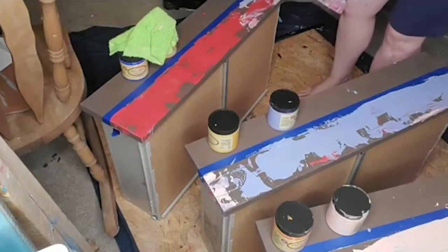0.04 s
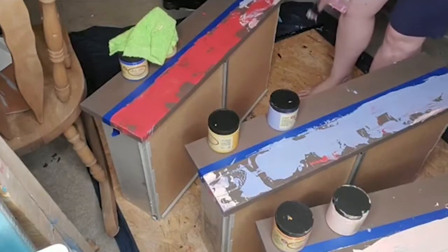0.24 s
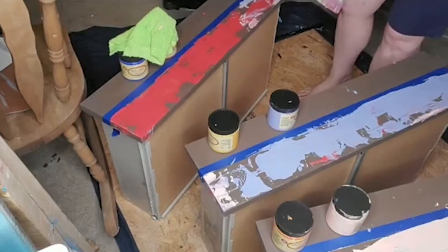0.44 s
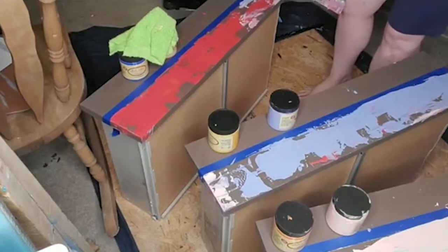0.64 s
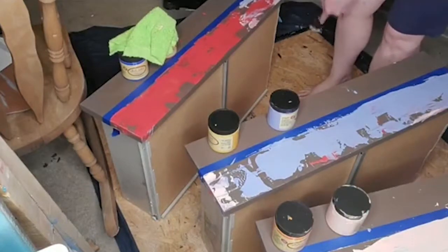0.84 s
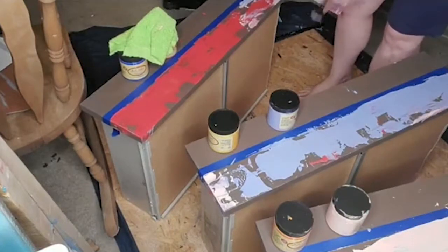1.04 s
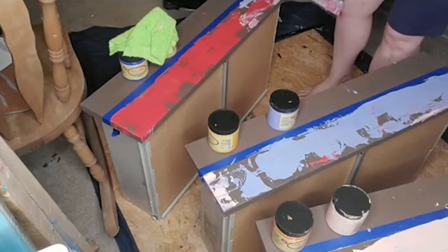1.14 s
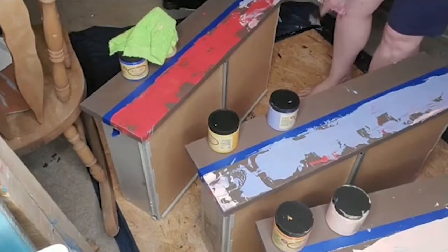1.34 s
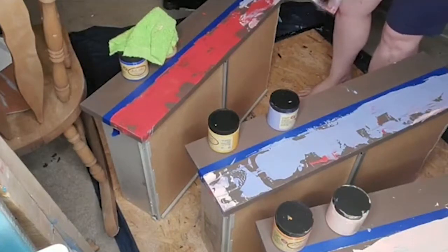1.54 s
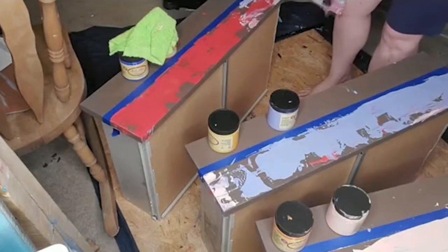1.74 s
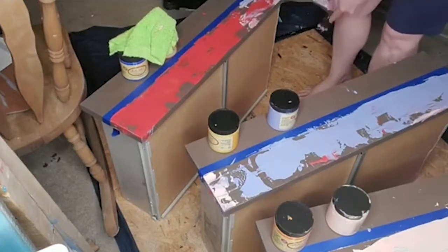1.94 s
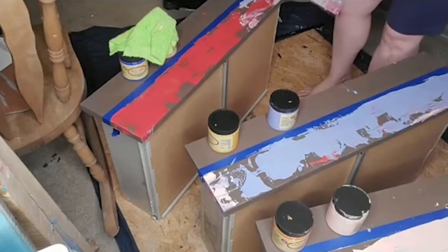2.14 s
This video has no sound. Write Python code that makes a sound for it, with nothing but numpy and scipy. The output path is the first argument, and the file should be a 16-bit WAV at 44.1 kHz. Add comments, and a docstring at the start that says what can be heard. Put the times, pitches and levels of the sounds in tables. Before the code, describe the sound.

A steel putty knife scrapes painted wood, snapping sharply four times over a faint machine hum.

```python
"""A small hard room, the microphone at a steel putty knife that works over paint on a wooden board.
The blade is set down or catches, slides briefly and snaps forward when the paint lets go. Each contact is one
jolt through the ringing steel and the board; the slides are random grit through the blade, the squeals jittery
sines. Each excites decaying noise that stands for the room. Behind, a machine somewhere in the house: steady
coloured noise and two thin tones that waver a little."""
import sys
import numpy as np
from scipy import signal
from scipy.fft import rfft, irfft, next_fast_len
from scipy.io import wavfile
from scipy.ndimage import map_coordinates

SR = 44100
rng = np.random.default_rng(int(sys.argv[2]) if len(sys.argv) > 2 else 0)


def to_wav(s):
    """Save 16-bit WAV."""
    ch = np.atleast_2d(s).T  # columns
    pcm = np.round(np.clip(ch, -1, 1) * 32767)  # PCM
    wavfile.write(sys.argv[1], SR, pcm.astype(np.int16))


def rack_gain(trim_db):
    """Turn a fader trim in dB into the linear factor to multiply a signal by."""
    fader = np.asarray(trim_db, float)
    return 10 ** (fader / 20)


N = 97020  # 2.2 s
SPAN = 1 << 14  # samples of one event with its room
HZ = np.fft.rfftfreq(SPAN, 1 / SR)

# The blade snaps forward. Each row: start in seconds, relative level in dB, brightness in dB per octave,
# low and high knock of the board in dB over the blade's strongest frequency.
SNAPS = [(0.2618, -14, 0.53, -17.5, -36), (0.8579, -16.5, 1.8, -6.5, -10.5), (1.4013, -14, 0, -16, -49.5),
         (1.88, -12.5, -1, -48, -15)]
# The free end is held shorter or longer, so each snap rings elsewhere.
# Each row, in step with the snaps: ring in dB over the clatter, four bending pitches in Hz.
SNAP_RINGS = [(4.3, 2030, 2400, 4530, 5500), (6.5, 2900, 2000, 4290, 5980), (4.3, 2600, 3330, 5940, 7530),
              (5.5, 1840, 2650, 3820, 6600)]
# The blade is set down or catches. Each row: start in seconds, relative level in dB, brightness in dB per octave,
# first and second bending pitch in Hz.
TOUCHES = [(.001, -40.5, 6, 1860, 4280), (0.5605, -31, 0, 2170, 4370), (0.8769, -24.5, -2.5, 4220, 2810),
           (1.2645, -26.5, 0, 3160, 4390), (1.3659, -25.5, 4.5, 1770, 3880),
           (1.7232, -28, -6.5, 1324, 2570), (1.762, -30, -3.5, 1125, 4900), (1.786, -33.5, 0.5, 2670, 5100),
           (1.851, -37, 0.5, 3300, 6100), (2.1592, -31, -1.5, 1270, 4420)]
# Slides over the paint. Each row: start in seconds, length in seconds, first and last relative level in dB,
# brightness in dB per octave.
SLIDES = [(0.202, 0.063, -62, -43.5, 2.5), (0.574, 0.04, -55, -56, 2.5), (0.806, 0.031, -74.5, -51, 0.5),
          (0.827, 0.074, -48, -42.5, 4.5), (1.332, 0.038, -54.5, -36, 3), (1.375, 0.026, -47, -44, -5.5),
          (1.738, .06, -49, -46, -2.5), (1.796, 0.049, -49.5, -46.5, 0.5), (1.867, 0.0027, -49.5, -47, 24)]
# The edge squeals. Each row: start in seconds, length in seconds, pitch in Hz, level before the fades in dB.
SQUEALS = [(.828, 0.017, 4400, -49), (.246, 0.023, 4430, -31.5), (0.248, 0.012, 11060, -33),
           (.246, 0.0157, 9600, -40.5)]
# Modes of the steel. Each row: pitch in Hz, width in Hz, mean strength in dB over the broad clatter.
BLADE_MODES = [(2364, 160, -4), (3970, 150, -3.5), (4780, 61, -1.5), (5994, 2200, -2), (6280, 120, -11),
               (7570, 290, 1), (9180, 410, -1), (10030, 230, 3), (11440, 1700, 4.5)]
# Broad clatter of a snap, of a touch and of a slide. Each row: frequency in Hz, relative gain in dB.
SNAP_CLATTER = [(530, -25), (1060, -26.5), (1470, -9.5), (2080, 2), (2910, -3), (4470, -2), (8440, -3),
                (11400, -6.5), (14600, -16), (15700, -37.5)]
TOUCH_CLATTER = [(530, -47.5), (900, -20.5), (1300, -5.5), (1650, -5.5), (2700, -5), (3500, -10),
                 (5600, -9), (8000, -6.5), (11500, -16), (14600, -21.5), (15700, -66.5)]
SLIDE_RASP = [(530, -45), (900, -17.5), (2770, 5), (3050, 1), (3320, 4), (4980, 0), (8850, -9.5),
              (10100, -7), (12100, -11.5), (14800, -24.5), (15700, -62)]
# Resonances of the wooden board. Each row: pitch in Hz, width in Hz.
BOARD = [(450, 260), (960, 110)]
# Decay of the room. Each row: frequency in Hz, time to fall by 60 dB in seconds.
ROOM = [(300, 0.35), (800, 0.31), (2100, 0.2), (5500, .22), (12000, 0.2), (16000, 0.034)]
# Colour of the machine's rumble and hiss. Each row: frequency in Hz, relative gain in dB.
RUMBLE = [(21, -68.5), (35, -1), (134, 0), (195, -14), (251, -9), (298, -20), (346, -13), (556, -23),
          (614, -16.5), (662, -24.5), (732, -15.5), (829, -22.5), (915, -22.5), (1400, -27.5),
          (1580, -30.5), (2080, -33.5), (2240, -34), (2540, -34), (3700, -35.5), (6390, -47),
          (10800, -47.5), (13500, -64)]
# Thin tones of the machine. Each row: pitch in Hz, mean level in dB rms, depth of the wavering in dB.
TONES = [(720.3, -62.6, .8), (119.5, -61, 1.8)]

MODE_SCATTER_DB = 4  # from contact to contact
SNAP_SPREAD_S, TOUCH_SPREAD_S = 0.0014, 0.003  # largest delay between the frequencies of a contact
SNAP_WIDTH, BEND_WIDTH = 0.07, 0.12  # width of a ring over its pitch
FIRST_BEND_DB, SECOND_BEND_DB, HANDLE_DB = 18, 17, 14  # rings of a touch over the clatter
HANDLE_HZ, TOUCH_KNOCK_DB = 2064, -20.5  # ring shared by all touches, knock of the board
GRIT_PER_S, GRIT_SPREAD_DB = 3000, 2.6  # grains in a slide, scale of their uneven strength
CATCH_DB, CATCH_PER_S, SLIDE_RISE_S = 2.2, 150, 0.0015  # the slide is uneven and fades in
SQUEAL_JITTER, SQUEAL_RISE_S = 0.045, 0.0035  # radians a sample, seconds
# Room over direct sound in dB; a snap points at the microphone.
SNAP_WET_DB, TOUCH_WET_DB, SLIDE_WET_DB, SQUEAL_WET_DB = 2, 5, 4, 0
# Delay of the first wall; the early room stands out of the tail, which takes a moment to build.
FIRST_WALL_S, EARLY_DB, EARLY_S, BUILD_S = 0.0012, 2, 0.0061, 0.0016
RUMBLE_DB = -53  # dB rms


def snaps():
    """The paint lets go and the bent blade springs forward, ringing at the pitches of its free length."""
    out = np.zeros(N + SPAN)
    for (start, db, bright, *knocks_db), (ring_db, *pitches) in zip(SNAPS, SNAP_RINGS):
        bends = [(hz, ring_db) for hz in pitches]
        gain = blade(SNAP_CLATTER, bright, SNAP_WIDTH, *bends)
        sound = contact(gain, knocks_db, SNAP_SPREAD_S, db + 10.5)
        add_in_room(out, start, sound, SNAP_WET_DB)
    return out[:N]


def touches():
    """The blade set down or catching: two changing bends, one shared ring and a light knock of the board."""
    out = np.zeros(N + SPAN)
    for start, db, bright, first_hz, second_hz in TOUCHES:
        bends = [(first_hz, FIRST_BEND_DB), (second_hz, SECOND_BEND_DB), (HANDLE_HZ, HANDLE_DB)]
        gain = blade(TOUCH_CLATTER, bright, BEND_WIDTH, *bends)
        sound = contact(gain, [TOUCH_KNOCK_DB] * len(BOARD), TOUCH_SPREAD_S, db + 10)
        add_in_room(out, start, sound, TOUCH_WET_DB)
    return out[:N]


def slides():
    """Edge over paint: sparse random grains shake the blade while the stroke swells or fades."""
    out = np.zeros(N + SPAN)
    t = np.arange(SPAN) / SR
    for start, length, first_db, last_db, bright in SLIDES:
        chance, push, rank = rng.random((3, SPAN))
        strength = rack_gain(-GRIT_SPREAD_DB * np.log(rank + 1 / 40))
        grit = (chance < GRIT_PER_S / SR) * (push - 0.5) * strength
        rasp = unit(irfft(rfft(grit) * causal(blade(SLIDE_RASP, bright, BEND_WIDTH))))
        # the direct sound is lowered by the room's share
        stroke = rack_gain(np.interp(t, [0, length], [first_db, last_db]) - SLIDE_WET_DB)
        stroke = stroke * np.minimum(t / SLIDE_RISE_S, 1) * (t < length)
        catches_db = CATCH_DB * map_coordinates(rng.standard_normal(60), [t * CATCH_PER_S])
        add_in_room(out, start, rasp * stroke * rack_gain(catches_db), SLIDE_WET_DB)
    return out[:N]


def squeals():
    """The edge squeals: short sines whose phase wanders at random."""
    out = np.zeros(N + SPAN)
    t = np.arange(SPAN) / SR
    for start, length, hz, db in SQUEALS:
        wander = np.cumsum(SQUEAL_JITTER * rng.standard_normal(SPAN))
        wave = np.sin(2 * np.pi * hz * t + wander)
        fades = np.clip(t / SQUEAL_RISE_S, 0, 1) * np.clip(1 - t / length, 0, 1)
        add_in_room(out, start, rack_gain(db) * wave * fades, SQUEAL_WET_DB)
    return out[:N]


def blade(clatter, bright_db, width, *bends):
    """Gain of the steel: broad clatter, its modes at new strengths, and the bends (Hz, dB) of the free end."""
    modes = sum(rack_gain(db + MODE_SCATTER_DB * rng.standard_normal()) * hump(hz, w) ** 2
                for hz, w, db in BLADE_MODES)
    rings = sum(rack_gain(db) * hump(hz, width * hz) ** 2 for hz, db in bends)
    tilt_db = bright_db * np.log2((HZ + 1) / 4000)
    return rack_gain(along(clatter, HZ) + tilt_db) * (1 + modes + rings)


def contact(gain, knocks_db, spread_s, db):
    """One jolt through blade and board; the frequencies arrive a little apart. db sets its total energy."""
    board = sum(rack_gain(knock_db) * hump(hz, w) ** 2 for (hz, w), knock_db in zip(BOARD, knocks_db))
    delay_s = spread_s * np.interp(HZ, np.linspace(0, SR / 2, num=30), rng.random(30) ** 2)
    # summing delay over frequency gives the phase
    phase = 2 * np.pi * np.cumsum(delay_s) * SR / SPAN
    jolt = irfft(causal(gain / gain.max() + board) * np.exp(-1j * phase))
    return rack_gain(db) * jolt / np.sqrt(np.sum(jolt ** 2))


def add_in_room(out, start, sound, wet_db):
    """Lays a sound and a fresh answer of the hard room into out: noise that dies at each pitch's own rate."""
    hz, t, cells = signal.stft(rng.standard_normal(SPAN), SR, nperseg=256)
    decay_db = -60 * t / along(ROOM, hz)[:, None]
    early_db = EARLY_DB * np.exp(-t / EARLY_S)
    tail = signal.istft(cells * rack_gain(decay_db + early_db), SR, nperseg=256)[1][:SPAN]
    tail = tail * np.sqrt(1 - np.exp(-np.arange(SPAN) / SR / BUILD_S))
    tail = rack_gain(wet_db) * tail / np.linalg.norm(tail)
    answer = np.pad(tail, (round(FIRST_WALL_S * SR), 0))
    answer[0] = 1  # the direct sound
    out[round(start * SR):][:SPAN] += signal.fftconvolve(sound[:SPAN // 2], answer)[:SPAN]


def machine():
    """Somewhere in the house: rumble and hiss, with tones that waver slowly in level and phase."""
    t = np.arange(N) / SR

    def waver():
        """A smooth random curve, 12 new points a second."""
        return map_coordinates(rng.standard_normal(40), [t * 12])

    out = noise(RUMBLE, RUMBLE_DB)
    for hz, db, depth_db in TONES:
        level = np.sqrt(2) * rack_gain(db + depth_db * waver())
        out += level * np.sin(2 * np.pi * hz * t + 0.047 * waver())
    return out


def noise(spectrum, db):
    """Steady coloured noise at db rms, shaped by its spectrum."""
    m = next_fast_len(N + SPAN)
    gain = rack_gain(along(spectrum, np.fft.rfftfreq(m, 1 / SR)))
    coloured = irfft(rfft(rng.standard_normal(m)) * gain, m)[:N]
    return rack_gain(db) * unit(coloured)


def unit(x):
    """Scales a sound to an rms of 1."""
    return x / np.sqrt(np.mean(x ** 2) + 1e-20)


def along(points, hz):
    """Reads a curve of (Hz, value) points on a log frequency axis."""
    f, v = np.transpose(points)
    return np.interp(np.log(hz + 1), np.log(f + 1), v)


def causal(gain):
    """The minimum-phase response with this gain: it sounds only after the blow."""
    cepstrum = irfft(np.log(gain + 1e-6))
    cepstrum[1:SPAN // 2] *= 2
    cepstrum[SPAN // 2 + 1:] = 0
    return np.exp(rfft(cepstrum))


def hump(hz, width_hz):
    """Gain of one resonance, 1 at its top."""
    return HZ * width_hz / np.hypot(hz * hz - HZ ** 2, HZ * width_hz + 1e-9)


def scene():
    """The knife close by, over the machine in the distance; one channel."""
    knife = snaps() + touches() + slides() + squeals()
    return (knife + machine())[None]


def top_cut(x):
    """Nothing passes above the cut-off."""
    return signal.sosfilt(signal.butter(12, 15870, fs=SR, output="sos"), x)


def record(dry):
    """Passes the finished mix on, with no further change of level."""
    mix = dry
    return top_cut(mix)


dry = scene()
out = record(dry)
to_wav(out)
```